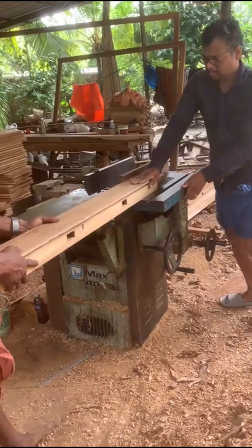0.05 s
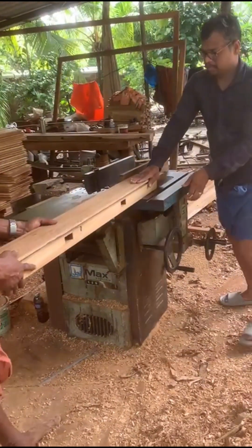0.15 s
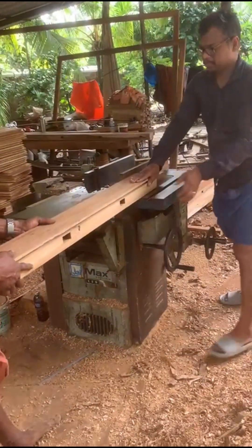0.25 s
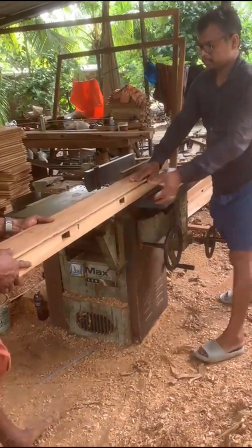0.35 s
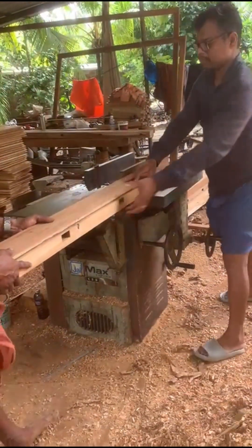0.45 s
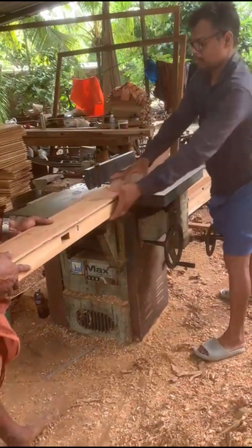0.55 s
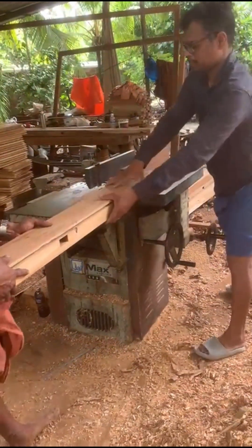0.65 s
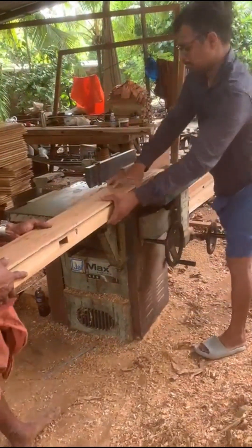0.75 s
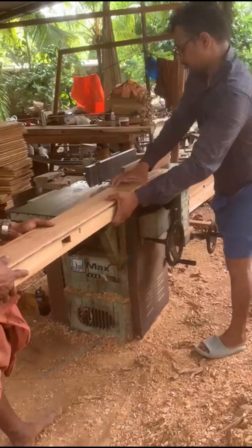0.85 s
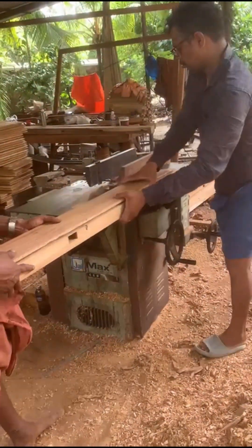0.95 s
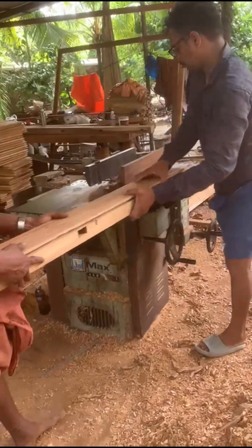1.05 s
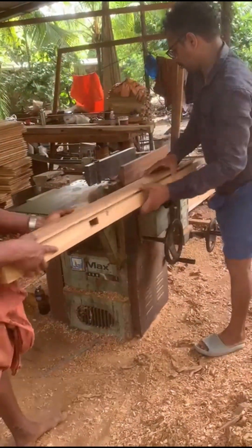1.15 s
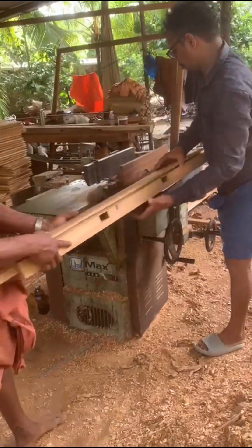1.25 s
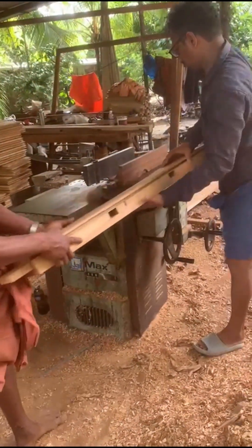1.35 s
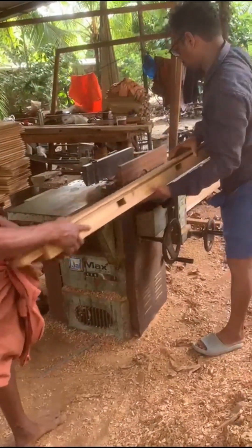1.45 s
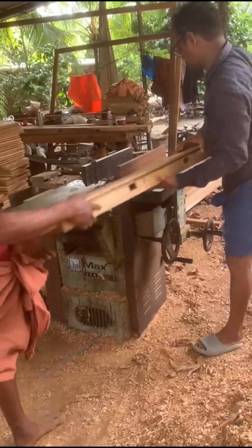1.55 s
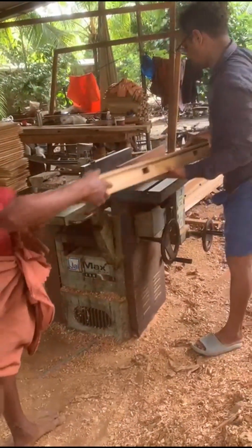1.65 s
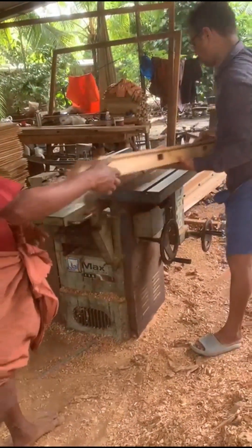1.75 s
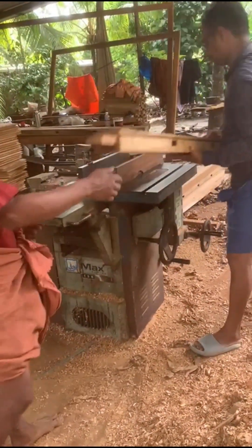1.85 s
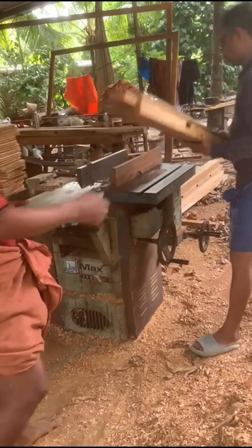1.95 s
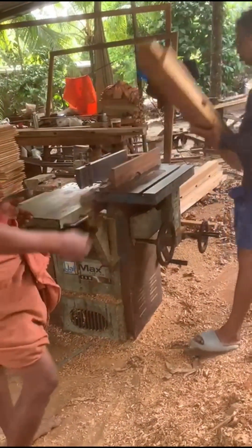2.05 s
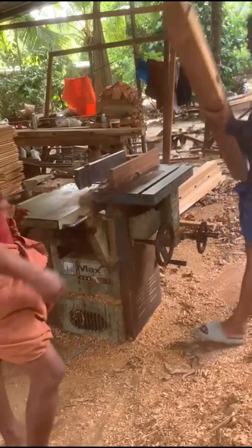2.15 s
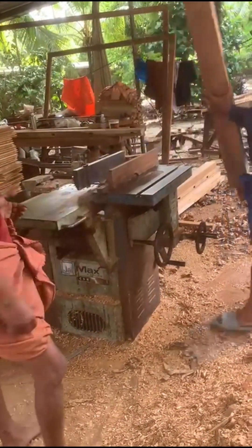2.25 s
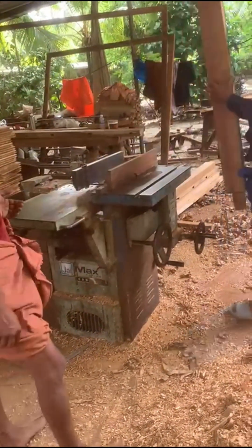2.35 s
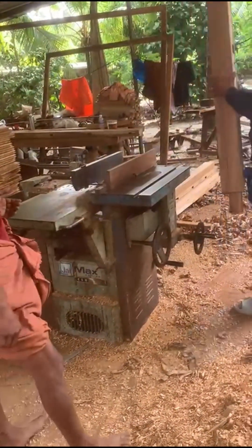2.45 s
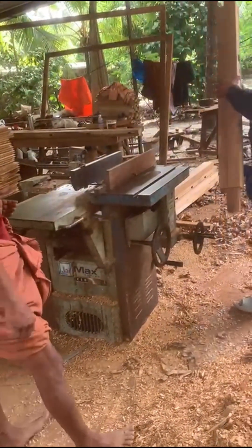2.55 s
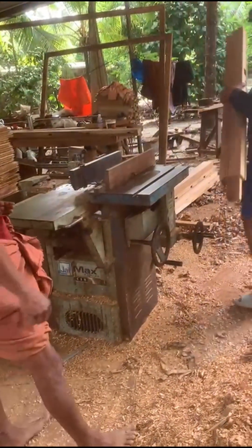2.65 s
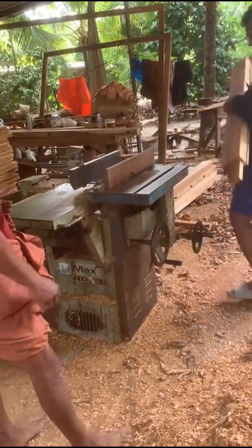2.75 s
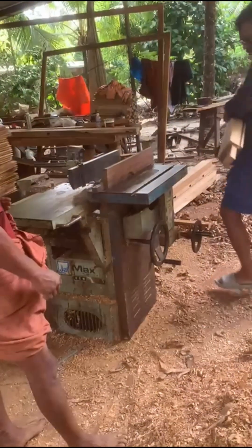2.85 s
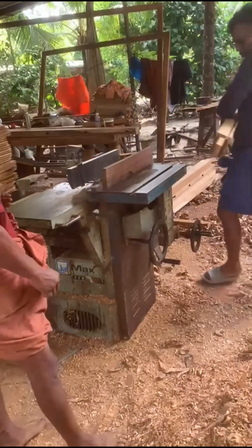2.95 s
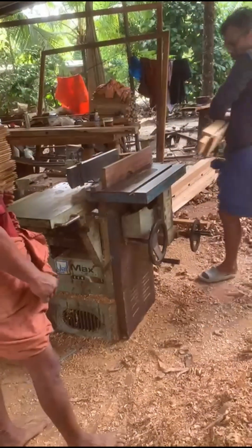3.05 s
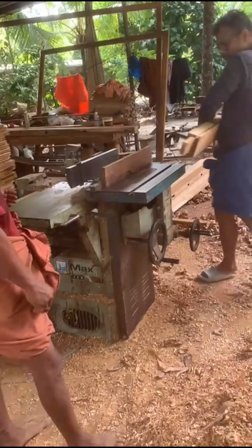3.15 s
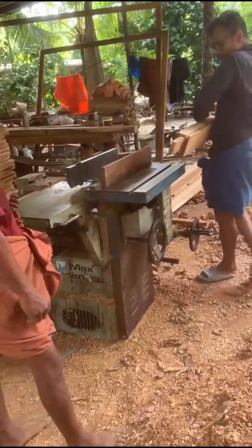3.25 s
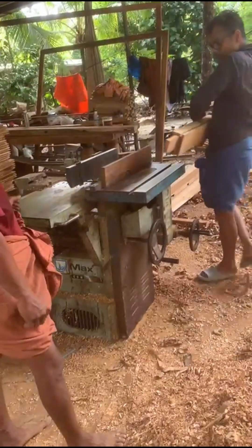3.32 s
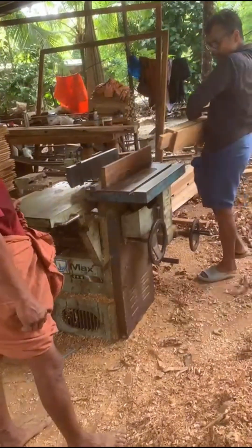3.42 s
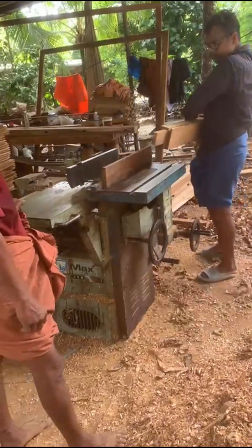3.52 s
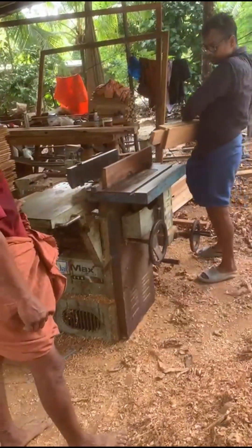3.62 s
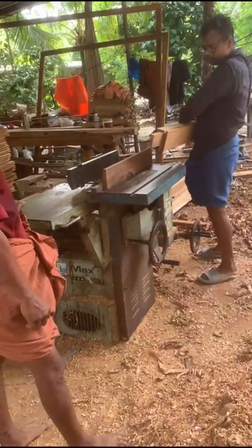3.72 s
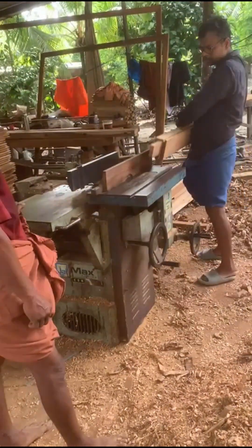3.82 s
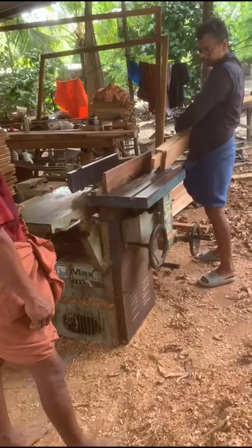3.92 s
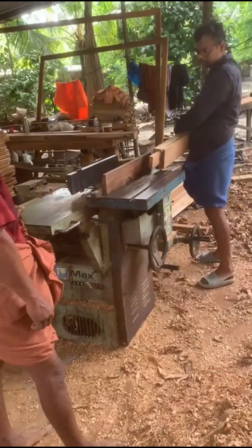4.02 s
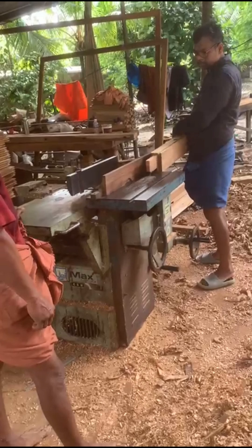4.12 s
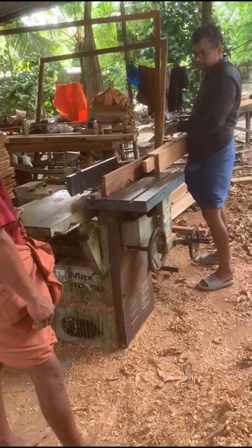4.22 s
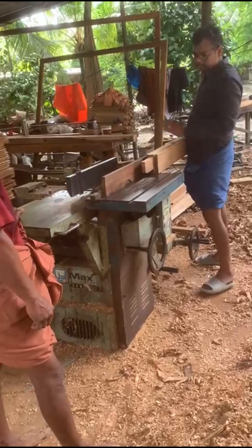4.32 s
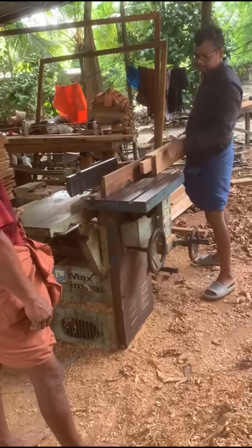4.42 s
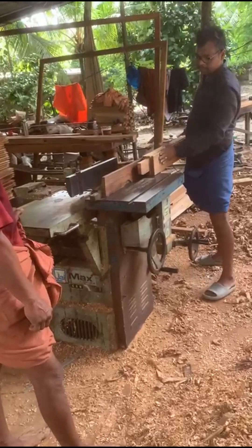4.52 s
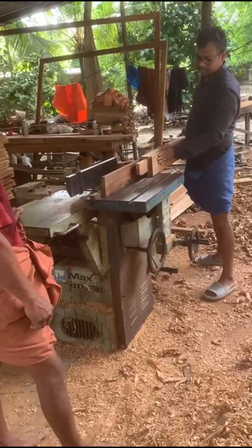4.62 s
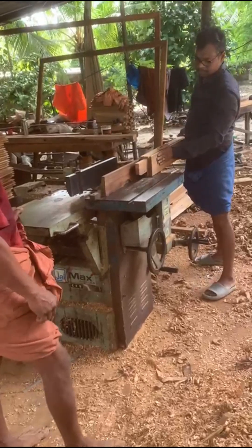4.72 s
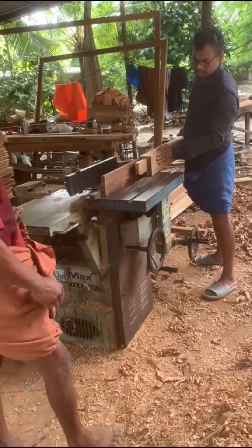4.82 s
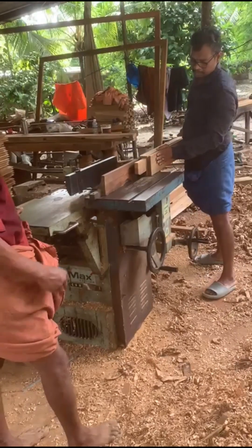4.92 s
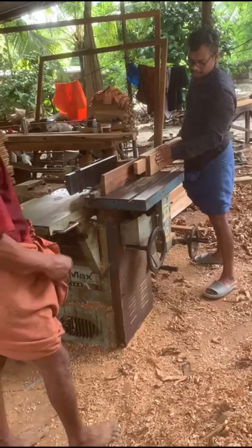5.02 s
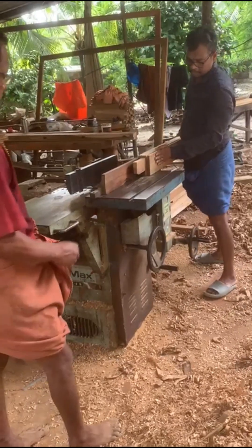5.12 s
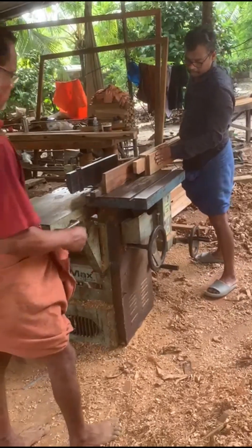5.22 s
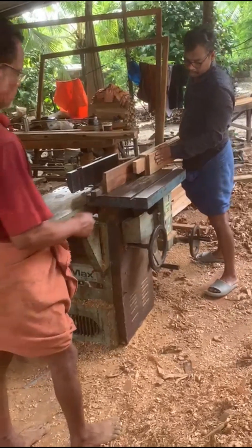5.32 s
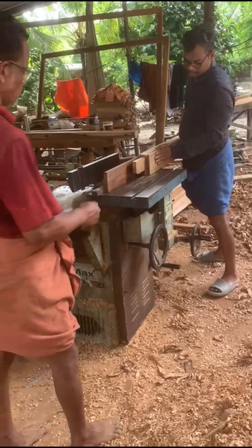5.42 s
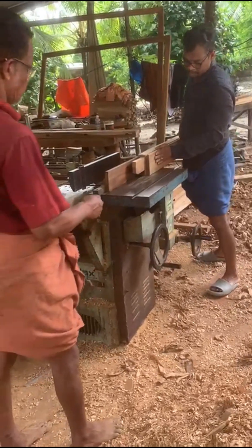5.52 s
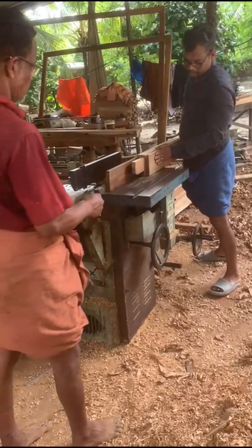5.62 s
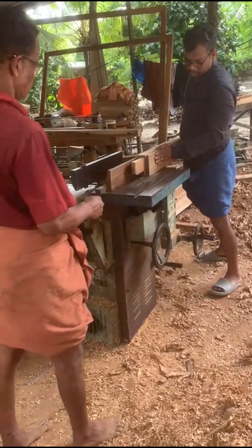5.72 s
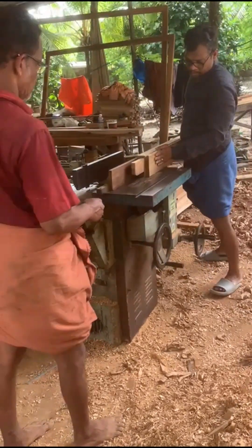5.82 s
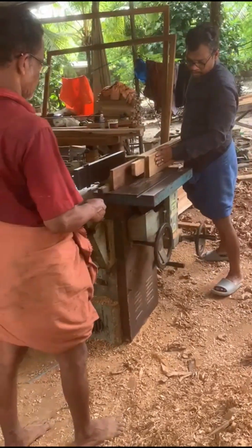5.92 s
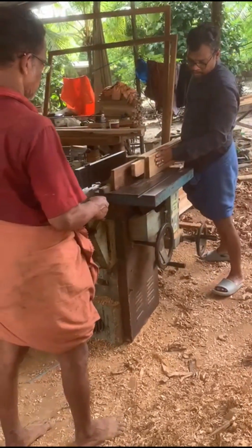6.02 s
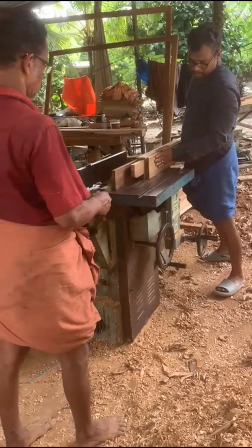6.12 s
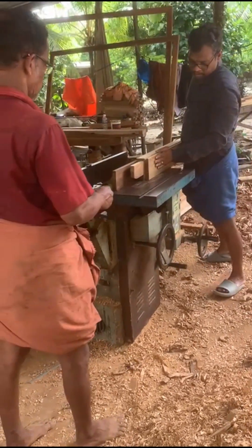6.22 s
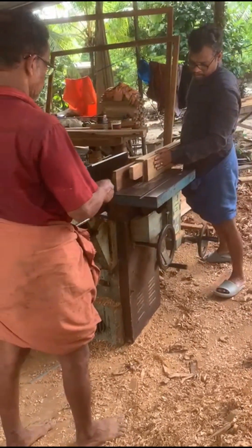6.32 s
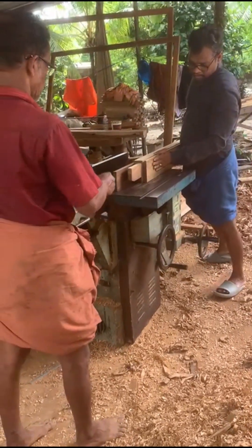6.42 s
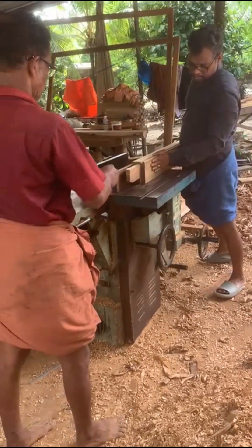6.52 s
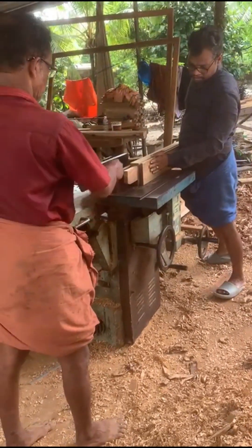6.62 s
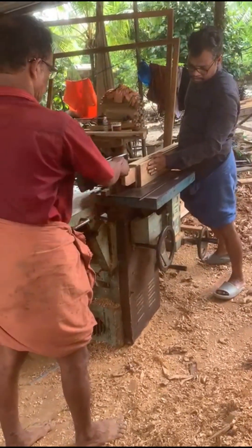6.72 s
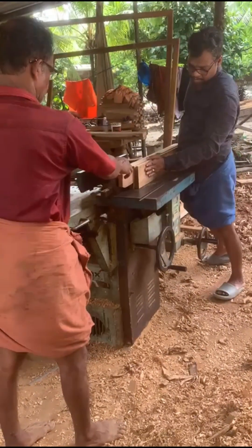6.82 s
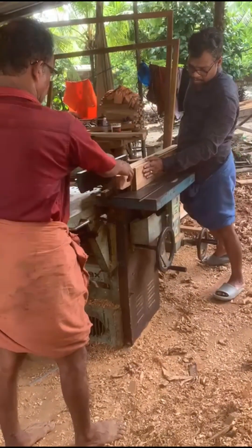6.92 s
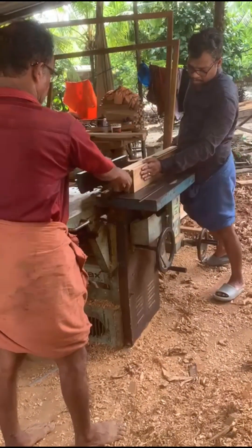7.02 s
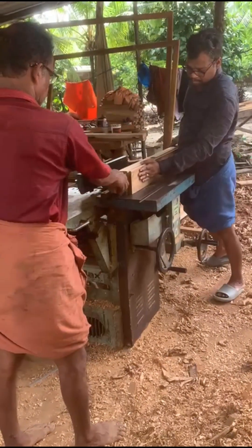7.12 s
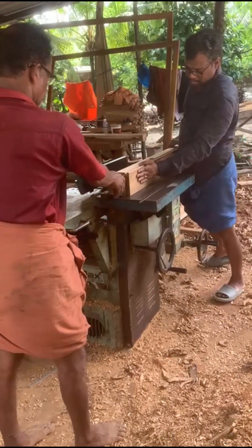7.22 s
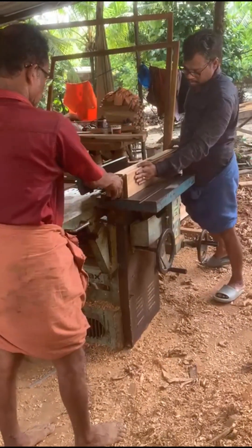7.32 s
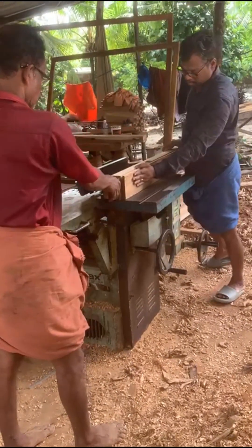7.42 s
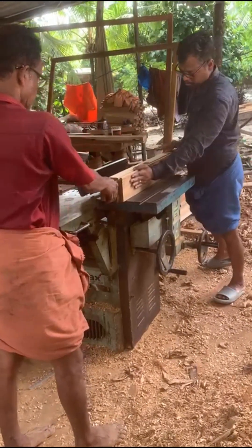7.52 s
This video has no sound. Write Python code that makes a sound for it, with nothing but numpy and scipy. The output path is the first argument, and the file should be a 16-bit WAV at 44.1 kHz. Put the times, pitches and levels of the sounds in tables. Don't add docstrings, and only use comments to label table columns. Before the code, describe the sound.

A planer idles with a steady low hum and airy hiss, a plank knocks onto its iron table, then knives bite with a loud screaming rasp.

```python
import sys
import numpy as np
from scipy import signal
from scipy.fft import rfft, irfft, next_fast_len
from scipy.io import wavfile
from scipy.ndimage import uniform_filter1d, map_coordinates

SR = 44100
rng = np.random.default_rng(int(sys.argv[2]) if len(sys.argv) > 2 else 0)


def master_out(mix):
    frames = np.transpose(np.atleast_2d(mix))
    ceiling = np.clip(frames, -1, 1)
    pcm = np.round(ceiling * 32767).astype(np.int16)
    wavfile.write(sys.argv[1], SR, pcm)


def invert_db(level):
    return 10 ** (np.asarray(level, dtype=float) / 20)


N = 333835

# start_s, turns_per_s
SHAFT_SPEED = [
    (0, 72.07),
    (6.08, 72.06),
    (6.25, 71.87),
    (6.44, 71.62),
    (6.6, 71.33),
    (6.7, 71.2),
    (6.9, 71.19),
    (7.08, 71.13),
    (7.24, 71.2),
    (7.57, 71.32),
]
# start_s, hum_db
NEARNESS = [(0, -44), (.55, -42), (1.22, -42), (1.64, -40.5), (2.4, -41), (3.33, -40), (4.19, -39),
            (5.1, -39.5), (6.07, -38), (6.37, -34.5), (6.85, -36), (7.57, -38)]
# start_s, feed_pressure_db, seated_flat (0-1)
HAND_FEED = [
    (6.07, -18, 0.5),
    (6.2, -17.5, 0),
    (6.3, -20.5, 0),
    (6.44, -19, 0.16),
    (6.6, -21, 0.69),
    (6.76, -17, 0.62),
    (7.08, -19.5, 0.81),
    (7.28, -24, 0.93),
    (7.57, -21.5, 0.67),
]
KNIFE_BITE = [1, .09, .05]


def rms(x):
    return np.sqrt(np.mean(np.abs(x) ** 2) + 1e-20)


def unit(x):
    return x / rms(x)


def along(points, hz):
    f, v = np.transpose(points)
    return np.interp(np.log(hz + 1), np.log(f + 1), v, left=-120, right=v[-1])


def curves(rows):
    s, *cols = np.transpose(rows)
    return [np.interp(np.arange(N) / SR, s, c) for c in cols]


def wobble(rate, size=N):
    knots = rng.standard_normal(int(size * 80 / SR) + 4)
    return map_coordinates(knots, [np.arange(size) * min(rate, 80) / SR])


def patches(shape, bins, frames):
    across = uniform_filter1d(rng.standard_normal(shape), bins, 0)
    return unit(uniform_filter1d(across, frames, 1))


def filtered(x, response):
    m = next_fast_len(len(x) + 8192)
    return irfft(rfft(x, m) * response(np.fft.rfftfreq(m, 1 / SR)), m)[:len(x)]


def rush(spectrum, patchy_db):
    z = signal.stft(rng.standard_normal(N), nperseg=512)[2]
    x = signal.istft(z * invert_db(patchy_db * patches(z.shape, 8, 8)), nperseg=512)[1][:N]
    return unit(filtered(x, lambda hz: invert_db(along(spectrum, hz))))


def shaft_angle():
    return 2 * np.pi * np.cumsum(curves(SHAFT_SPEED)[0]) / SR


def slowing():
    speed = curves(SHAFT_SPEED)[0]
    return speed[0] - speed


def frame():
    # pitch_hz, level_db
    belt_tones = [(50.8, -59), (82.4, -51.5), (260.1, -65), (305.5, -54.5), (334.1, -55.5), (639.3, -58),
                  (915.2, -55), (945.1, -55.5), (974.0, -50), (1030.9, -49.5), (1059.8, -55.5)]
    # pitch_hz, level_db (per Hz)
    rumble_colour = [(20, -12), (40, -49), (60, -24), (100, -6), (160, -7), (300, -4.5), (500, -4.5),
                     (700, -4), (1000, -5), (1150, -2.5), (1500, -7), (1800, -8), (2100, -10), (2500, -23)]
    t, lost = np.arange(N) / SR, slowing()
    tones = np.zeros(N)
    for hz, db in belt_tones:
        level = invert_db(db + 46.5 + 4.0 * wobble(3.35))
        tones += level * np.sin(2 * np.pi * hz * t + 1.5 * wobble(4))
    level_db = curves(NEARNESS)[0] - 6 - 3.5 * lost
    return invert_db(level_db) * (invert_db(-9 * lost) * tones + invert_db(5.0) * rush(rumble_colour, patchy_db=1.0))


def air():
    # pitch_hz, level_db (per Hz)
    whirr_colour = [(2000, -20), (2400, -9), (2900, -9), (3400, -1), (3800, 0), (4300, -5), (5000, -7),
                    (5600, -14), (6500, -30)]
    hiss_colour = [(4500, -20), (5500, -2), (6500, -2), (8000, 0), (10000, -1), (11500, -3)]
    beat = 0.05 * np.sin(3 * shaft_angle())
    near_db = 2.38 * (curves(NEARNESS)[0] - NEARNESS[0][1])
    whirr = invert_db(-51.5 + 0.64 * near_db) * (1 + beat) * rush(whirr_colour, patchy_db=1.5)
    hiss_level = invert_db(-59 + near_db + 1.6 * wobble(25))
    return whirr + hiss_level * (1 + 1.1 * beat) * rush(hiss_colour, patchy_db=2.5)


def hum():
    # order (multiple of shaft speed), level_db
    shaft_orders = [(1, -52.0), (2, -58.0), (3, -40.0), (4, -58.0), (6, -42.0), (9, -53.0), (12, -45.0),
                    (15, -47.0), (18, -55.0), (21, -58.0), (24, -54.0), (27, -50.0), (30, -51.0),
                    (33, -67.0), (36, -70.0), (39, -67.0), (45, -66.0), (51, -63.0)]
    turn, lost = shaft_angle(), slowing()
    lines = np.zeros(N)
    for k, db in shaft_orders:
        breath_db = (-0.18 + 0.036 * k) * wobble(3.998)
        covered_db = (0.95 * k + 2.3 * (k < 2)) * lost
        tone = np.sin(int(k) * turn + rng.uniform(0, 2 * np.pi))
        lines += invert_db(db + 43 + breath_db - covered_db) * tone
    lines += invert_db(-26 + 3 * wobble(2.5)) * np.sin(75 * turn)
    return invert_db(curves(NEARNESS)[0]) * lines


def knocks():
    # start_s, peak_db, pitch_hz
    set_downs = [
        (4.007, -36.5, 250),
        (4.031, -38, 267),
        (4.207, -28, 262),
        (4.26, -30, 250),
        (6.547, -33, 302),
    ]
    out, t = np.zeros(N + SR), np.arange(SR // 4) / SR
    for s, db, hz in set_downs:
        ring = sum(size * np.sin(2 * np.pi * ratio * hz * t)
                   for ratio, size in [(1, 1), (2.45, .7), (.52, .35)])
        puff = 3.1 * uniform_filter1d(rng.standard_normal(len(t)), size=24)
        envelope = invert_db(db - 60 * t / 0.17) * (1 - np.exp(-t / 0.0017))
        out[round(s * SR):][:len(t)] += envelope * (ring + puff)
    return out[:N]


def feed_from(start):
    bite_s, entry_s = 5.985, 0.076
    feed_db, seat = (c[start:] for c in curves(HAND_FEED))
    entry = np.clip((np.arange(start, N) / SR - bite_s) / entry_s, .001, 1)
    return feed_db, np.clip(seat, 0, 1), entry


def knife_strikes(turn):
    pattern = np.fft.fft(KNIFE_BITE)
    strikes, lag = np.zeros(len(turn)), 0
    for k in range(6, 168):
        rate = 3 + k / 25
        drift = wobble(rate, size=len(turn)) + 1j * wobble(rate, size=len(turn))
        lag += .0007 * k * (k + 10) * rng.normal()
        path = (1 + (.25 + .004 * k) * drift) * np.exp(1j * lag)
        strikes += np.real(pattern[k % 3] * path * np.exp(1j * k * turn))
    return strikes


def torn_fibres(turn):
    bite = sum(deep * np.exp(np.cos(turn - 2 * np.pi * k / 3) - 1) for k, deep in enumerate(KNIFE_BITE))
    ragged = invert_db(1.27 * wobble(28.0, size=len(turn)))
    return unit((.5 + bite) * ragged * rng.standard_normal(len(turn)))


def plank_body(f):
    # pitch_hz, level_db
    wood_colour = [(300, -24), (600, -12), (1150, -8), (1500, 0), (2100, -3), (2400, -11), (3300, -13),
                   (4000, -8), (4500, -1), (5500, -4), (6400, -8), (8200, 0), (8600, -8), (11500, -7)]
    # pitch_hz, width_hz, level_db
    resonances = [(566, 86, 9.5), (790, 31, 15.5), (1011, 44, 5), (1396, 67, 7.5), (1514, 60, 4),
                  (2135, 60, 1), (1610, 40, -0.5), (2450, 60, 11), (2780, 120, -7.5), (3203, 17, 8),
                  (4590, 180, 2.5), (5230, 81, 7.5), (5907, 36, 12.5), (6122, 120, 4.5), (7060, 62, 9)]
    ringing = 1
    for c, w, db in resonances:
        ringing = ringing + invert_db(db) * 1j * f * w / (c * c - f * f + 1j * f * w)
    return invert_db(along(wood_colour, f)) * ringing


def cut():
    # pitch_hz, width_hz, level_db (under the feed)
    loose_end = [
        (1140, 150, -17.5),
        (1940, 120, -15.5),
    ]
    start = round(5.96 * SR)
    turn = shaft_angle()[start:]
    feed_db, seat, entry = feed_from(start)
    rough = .3 + (.1 - .3) * seat
    strikes, fibres = knife_strikes(turn), torn_fibres(turn)
    boom_top, drone_top, rasp_top = 1080, 3000, 5700

    def above(f, hz):
        return 1 / (1 + (hz / (f + 1)) ** 16)

    voices = [(-36 + 27.5 * seat, 1.1, .4, lambda f: 1 - above(f, boom_top)),
              (-6.5, 2.4, .45, lambda f: above(f, boom_top) - above(f, drone_top)),
              (-3.8, 1.3, .9, lambda f: above(f, drone_top) - above(f, rasp_top)),
              (.1, .9, 1.5, lambda f: above(f, rasp_top))]
    for c, w, db in loose_end:
        voices.append((db - 23 * seat, 3, .3, lambda f, c=c, w=w: np.exp(-((f - c) / w) ** 2)))
    out = np.zeros(N)
    for db, slow, tear, band in voices:
        share = np.clip(tear * rough, 0, 1)
        clean, torn = (unit(filtered(x, lambda f: plank_body(f) * band(f))) for x in (strikes, fibres))
        out[start:] += invert_db(feed_db + db) * entry ** slow * (np.sqrt(1 - share) * clean + np.sqrt(share) * torn)
    out[start:] *= invert_db(.6)
    z = signal.stft(out, nperseg=1024)[2]
    grain = invert_db(np.linspace(1.2, 9, len(z))[:, None] * patches(z.shape, 4, 10))
    return signal.istft(z * grain / rms(grain), nperseg=1024)[1][:N]


def scene():
    field = frame() + air() + hum() + knocks() + cut()
    return np.array([field, field])


def roll_off(x):
    return signal.sosfilt(signal.butter(12, 13170, fs=SR, output="sos"), x)


def record(dry):
    # pitch_hz, turn_rad
    port_turn = [(880, 0), (1100, 1), (1250, 3.1), (1320, 4.5), (1420, 4.4), (1515, 3.3), (1650, 4.4),
                 (2250, 4.4), (2450, 3.6), (2900, 3.2), (3300, 3.95), (4000, 4.7), (4550, 3.9), (4900, 3.3),
                 (5300, 3.65), (5600, 2.65), (6050, 1.1), (6900, 0), (7600, -.45), (8300, -1.5),
                 (8850, -2.75), (9700, -3.14), (10500, -3.5), (10950, -4.7), (11600, -5.85)]
    # pitch_hz, width_hz, turn_rad
    plank_shadow = [
        (1487, 39, 3.5),
    ]
    hz, t, z = signal.stft(dry[0], SR, nperseg=2048)
    column = hz[:, None]
    high = column > 700
    waver = .32 * high * np.where(column > 6500, .7, 1) * patches(z.shape, 10, 3)
    half = (np.interp(hz, *np.transpose(port_turn))[:, None] + waver) / 2
    seat = np.interp(t, *np.transpose(HAND_FEED)[::2], left=0)
    for c, w, turn in plank_shadow:
        half = half + turn * np.exp(-((column - c) / w) ** 2) * seat / 2
    scatter = np.exp(.75j * patches(z.shape, 6, 5))
    pair = np.array([z * np.cos(half), -1j * z * scatter * np.sin(half)])

    power = uniform_filter1d(uniform_filter1d(np.abs(pair) ** 2, size=5, axis=1), size=3, axis=2)
    masker = uniform_filter1d(power.sum(0), size=23, axis=0)
    edge_hz = 11650 + 90 * patches((1, z.shape[1]), 1, 2)
    audible = power > high * masker * invert_db(np.where(column > 3000, -16, -21))
    keep = audible & (column < edge_hz)
    keep[1] &= high
    mid, side = signal.istft(pair * keep, SR, nperseg=2048)[1][:, :N]
    return roll_off(np.array([mid + side, mid - side]))


dry = scene()
out = record(dry)
master_out(out)
```